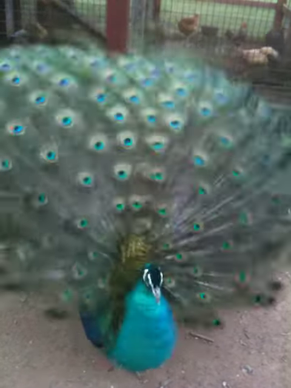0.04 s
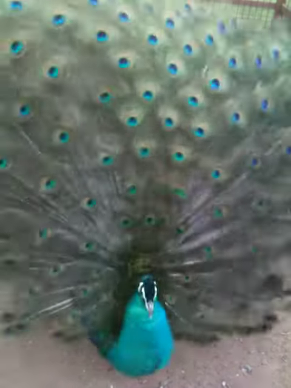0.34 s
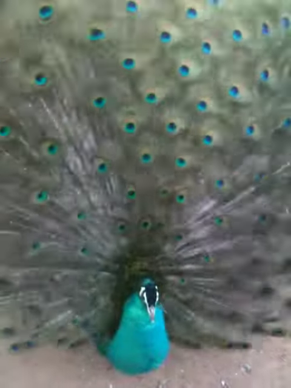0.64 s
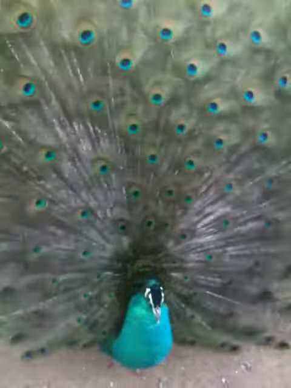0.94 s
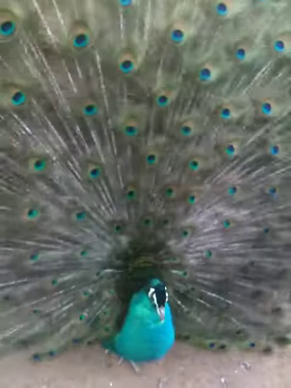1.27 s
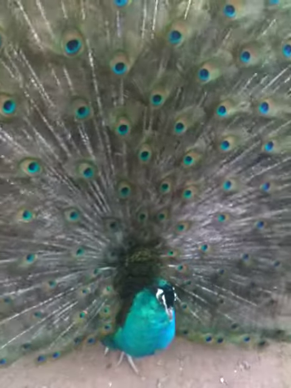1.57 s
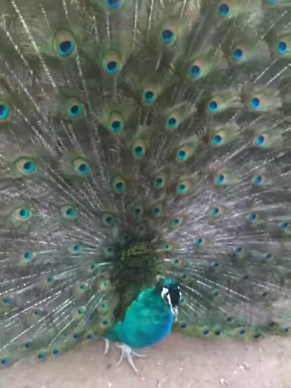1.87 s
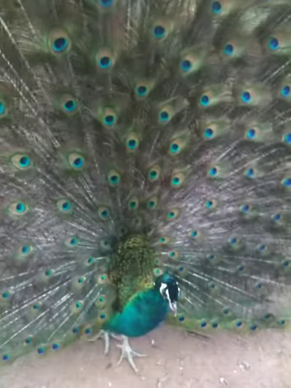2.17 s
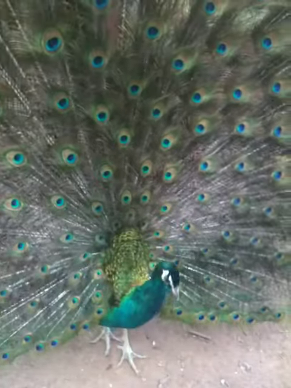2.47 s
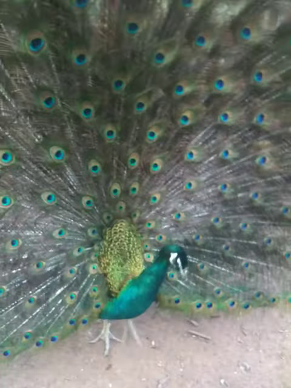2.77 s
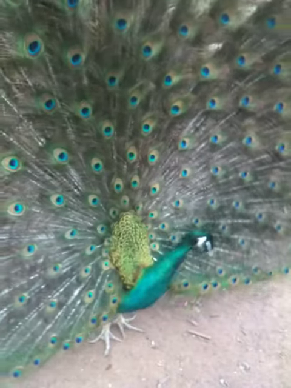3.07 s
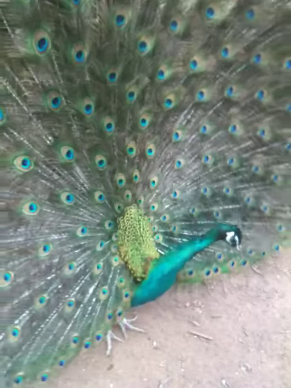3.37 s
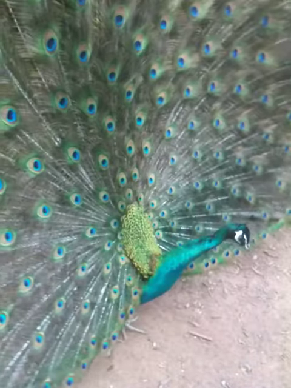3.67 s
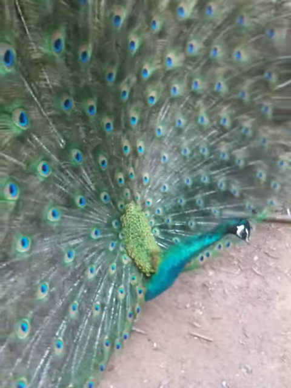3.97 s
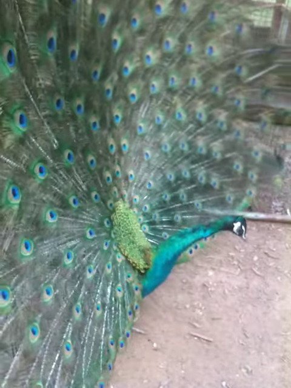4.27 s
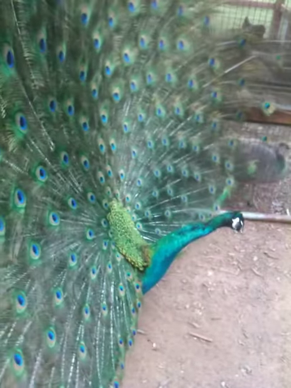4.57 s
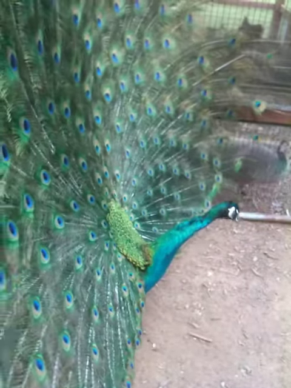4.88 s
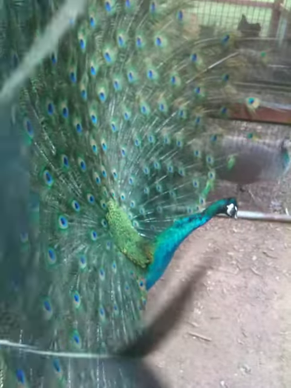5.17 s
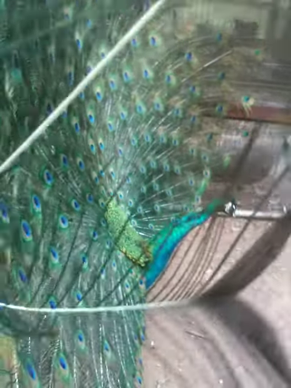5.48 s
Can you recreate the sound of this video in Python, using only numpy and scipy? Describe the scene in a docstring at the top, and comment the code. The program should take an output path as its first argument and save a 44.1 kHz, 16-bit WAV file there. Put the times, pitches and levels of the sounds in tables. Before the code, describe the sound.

Close by in an outdoor pen, a peacock shakes its raised tail, the quills clattering about ten times a second with small puffs of air. The rattle dies away into a soft rustle. As the bird steps round, something snaps underfoot, grit crunches and the feathers swish gently. Far off, birds faintly coo, chirp and whistle over a low rumble, a machine's hum and light hiss.

```python
"""An outdoor pen, one microphone close to a peacock shaking its raised train. About ten times a second
the quills clatter together and the fan puffs air; then the shaking dies away into a soft rustle of vanes.
The bird steps round: something snaps underfoot, grit crunches and the train swishes. Far off, birds coo,
chirp and whistle over a low rumble, a machine's hum and a faint hiss."""
import sys
import numpy as np
from scipy import signal
from scipy.fft import rfft, irfft, next_fast_len
from scipy.io import wavfile

SR = 44100
rng = np.random.default_rng(int(sys.argv[2]) if len(sys.argv) > 2 else 0)


def store_wav(level_fs):
    """Save 16-bit WAV to argv[1]."""
    pcm = np.round(np.clip(np.atleast_2d(level_fs), -1, 1) * 32767)
    wavfile.write(sys.argv[1], SR, pcm.T.astype(np.int16))


N = 243431
T = np.arange(N) / SR

# spectrum of the open-air hiss: f/Hz, level/dB
HISS_COLOUR = [(290, -40.5), (500, -9.5), (592, -1), (1300, -7), (3260, -11), (4020, -9.5), (4380, -11.5),
               (11400, -11.5), (14500, -10.5)]
# faint high whine: f/Hz, level/dB
WHINE_TONES = [(14971, -95), (15030, -85)]
# spectrum of the distant rumble: f/Hz, level/dB
RUMBLE_COLOUR = [(25, -33), (50, -28), (72, -18.5), (95, -3), (128, 2), (200, 1.5), (260, 4), (320, -1.5),
                 (385, -0.5), (450, -8), (600, -17.5), (1000, -33.5)]
# slow rise and fall of the rumble: t/s, relative level/dB
RUMBLE_LEVELS = [(1.5, -69.5), (2.07, -67.5), (2.64, -71), (3.08, -67), (3.85, -67.5), (4.62, -69),
                 (4.98, -66.5), (5.52, -67.5)]
# hum of a far machine before it fades: f/Hz, level/dB
HUM_TONES = [(91, -81), (259, -79)]
# swells of a vague, distant midrange stir: peak t/s, level/dB, rise/s, fall/s
STIR_SWELLS = [(1.6, -79.5, .8, 0.89), (2.9, -78, 0.19, 0.2), (5.05, -80, 0.35, .3)]
# spectrum of that stir: f/Hz, level/dB
STIR_COLOUR = [(300, -23.5), (600, -3.5), (1100, -1.5), (1800, -6), (2700, -10.5), (3600, -20), (6000, -25)]

# a small bird's raspy falling chirps: t/s, starting f/Hz, fall/share of f, rasp/share of f, level/dB
FAR_CHIRPS = [(2.508, 3950, .135, .033, -63), (3.192, 3690, .075, 0.042, -66),
              (4.219, 4270, .22, .085, -64.5)]
# thin calls that slide up and level off: t/s, length/s, starting f/Hz, rise/share of f, level/dB
FAR_PEEPS = [(2.573, .055, 7050, .015, -71.5), (4.817, .11, 7950, .14, -70.5)]
# level whistles and cries: t/s, length/s, f/Hz, level/dB
FAR_WHISTLES = [(2.845, .17, 1057, -75), (3.32, .22, 4130, -80.5), (3.51, 0.24, 4620, -81),
                (3.653, 0.43, 3510, -83), (4.645, 0.071, 1215, -79.5), (4.924, 0.31, 1434, -80.5)]
# low gliding coos: t/s, length/s, starting f/Hz, glide/share of f, level/dB
FAR_COOS = [(0, 0.086, 225, -0.042, -59.5), (1.801, 0.22, 387, -0.084, -62.5),
            (1.952, 0.144, 335, -.13, -62.5), (2.301, 0.171, 365, .2, -69), (2.846, .26, 262, -.26, -63.5),
            (3.188, 0.19, 223.4, 0.35, -67.5), (3.585, .14, 255, -0.13, -70),
            (3.673, .21, 128, -.13, -72.5), (4.183, 0.11, 268, -0.14, -66),
            (5.017, 0.34, 240, -0.21, -65.5)]

# spectrum of the train sweeping round: f/Hz, level/dB
SWISH_COLOUR = [(400, -11.5), (1500, -6), (2800, -2), (4300, -7), (5100, 1), (5800, 2.5), (6500, -5),
                (7500, 2), (8800, -5), (12000, -8), (15500, -24)]
# feet scuffing the grit: peak t/s, level/dB, length/s
FOOT_SCUFFS = [(1.896, -50.5, .021), (1.925, -60, 0.03), (2.433, -72, .012), (3.004, -68, 0.025),
               (3.045, -70, 0.039), (4.144, -72, 0.042), (4.73, -73.5, .11)]
# spectrum of the grit: f/Hz, level/dB
GRIT_COLOUR = [(180, -20), (300, -3.5), (812, -14.5), (896, -14.5), (1400, -7), (1740, -20), (1920, -11),
               (7370, -12), (15800, -17.5)]
# breaks underfoot: t/s, peak level/dB
SNAP_BREAKS = [(1.8698, -39), (1.8726, -39), (1.8766, -51)]
# modes ringing after each break: f/Hz, relative level/dB, t60/s
SNAP_RING = [(1370, -10.5, 0.0079), (2530, -15, 0.014), (5190, -4, 0.017), (5600, -6, 0.009),
             (7050, -7, 0.01), (8700, -7, 0.0093), (10000, -2, 0.0099), (10840, -5, .007)]

# swings of the train: t/s at full level, stroke level/dB, attack/s, hold/s, rebound level/dB
TRAIN_SWINGS = [(0.045, -38.5, 0.015, 0.016, -54), (0.16, -39.5, 0.02, 0.024, -38.5),
                (0.25, -36, 0.0024, 0.033, -45.5), (0.369, -34, 0.0034, 0.015, -45),
                (.476, -36, 0.0085, 0.014, -47), (.575, -34.5, .0015, 0.015, -40.5),
                (.687, -38, 0.004, 0.0043, -44), (0.778, -39.5, 0.0091, 0.012, -46),
                (0.878, -40, 0.0056, 0.013, -46.5), (.973, -37, 0.0031, 0.01, -46.5),
                (1.063, -41, 0.0088, 0.01, -47), (1.16, -44, 0.0046, 0.015, -49),
                (1.253, -47.5, 0.0016, 0.011, -55.5), (1.369, -53.5, .002, 0.024, -54.5),
                (1.465, -51, .002, .003, -53.5)]
# the fan billows once as it comes upright: peak t/s, level/dB, rise/s, fall/s
FAN_BILLOW = [(.184, -55, 0.014, .038)]
# spectrum of the air pushed by the fan: f/Hz, level/dB
WAFT_COLOUR = [(20, -17), (60, -7), (110, -12), (190, 1), (270, 3), (340, -9), (700, -55)]
# spectrum of vanes rubbing: f/Hz, level/dB
VANE_COLOUR = [(88, -36), (150, -3.5), (320, -9), (600, -2.5), (1100, -6), (1800, -5.5), (2800, -0.5),
               (4000, -3.5), (7250, -0.5), (13000, -8.5), (15800, -27)]
# resonances of the fan of shafts: f/Hz, width/Hz, lift/dB
SHAFT_RESONANCES = [(500, 53, 3), (670, 110, 1.5), (1001, 47, 4.5), (1412, 230, 4), (3390, 130, -0.5),
                    (7300, 1100, 2)]
# the heaviest stroke jolts the thick ends of the shafts: peak t/s, level/dB, rise/s, fall/s
SHAFT_JOLT = [(.377, -44.5, 0.0098, 0.0063)]
# spectrum of those thick ends: f/Hz, level/dB
JOLT_COLOUR = [(200, -31), (450, 7.5), (700, 13.5), (1050, 8), (1800, -22), (5000, -42)]
# hard knocks of quills meeting at the end of a swing: t/s, impulse level/dB
QUILL_KNOCKS = [(0.1413, -22.5), (0.256, -19.5), (0.2982, -20.5), (0.332, -22), (0.3653, -24), (.4143, -24),
                (0.5735, -23), (0.6228, -17.5), (.6865, -26), (0.7368, -31), (0.779, -22.5), (0.8155, -30),
                (0.8678, -32), (1.12, -24.5), (1.21, -25.5), (1.2483, -27), (1.2692, -32), (1.299, -28.5),
                (1.366, -35)]
# spectrum of quills striking: f/Hz, level/dB
QUILL_COLOUR = [(180, -25), (300, -10.5), (676, -6.5), (1230, -7), (1450, -6.5), (1860, -6.5), (3610, -2),
                (3990, -3.5), (7250, 1.5), (8840, -1.5), (14500, -8.5), (15800, -9)]


def undb(db):
    """Decibels to gain."""
    return 10 ** (np.asarray(db) / 20)


def unit(x):
    """Scale to an rms of one."""
    return x / np.sqrt(np.mean(x ** 2))


def colour(x, points, peaks=()):
    """Causal filter from (f/Hz, level/dB) points plus resonances; keeps the power of white noise."""
    size = 2 * next_fast_len(len(x))
    hz = np.maximum(np.fft.rfftfreq(size, 1 / SR), 1)
    point_hz, point_db = np.transpose(points)
    db = np.interp(np.log(hz), np.log(point_hz), point_db)
    for centre, width, lift in peaks:
        db = db + lift / (1 + (2 * (hz - centre) / width) ** 2)
    cepstrum = irfft(np.log(unit(undb(db))))
    cepstrum[1:size // 2] *= 2  # folding the cepstrum gives minimum phase
    cepstrum[size // 2 + 1:] = 0
    return irfft(rfft(x, size) * np.exp(rfft(cepstrum)))[:len(x)]


def drift(rate):
    """Smooth random wander that changes about rate times a second, rms one."""
    hz = np.fft.rfftfreq(N, 1 / SR)
    return unit(irfft(rfft(rng.standard_normal(N)) * np.exp(-(hz / rate) ** 2), N))


def ticks(rate, spread_db):
    """Random contacts of uneven strength, rate a second, rms one."""
    struck = rng.random(N) < rate / SR
    size = undb(spread_db * np.clip(rng.standard_normal(N), -2, 2)) * rng.choice([-1, 1], N)
    return unit(struck * size / np.sqrt(rate))


def swell(s, db, rise, fall, hold=0):
    """Amplitude of a rounded burst that reaches its level at s, holds and dies away."""
    outside = T - np.clip(T, s, s + hold)
    return undb(db) * np.exp(-.5 * (outside / np.where(T < s, rise, fall)) ** 2)


def swells(rows):
    """Amplitude of overlapping bursts, whose powers add."""
    return np.sqrt(sum(swell(*row) ** 2 for row in rows))


def ridge(peak_s, fall_db_per_s, rise_db_per_s=0):
    """Level in dB that holds at zero, or climbs to it, until peak_s and then falls steadily."""
    return np.where(T < peak_s, rise_db_per_s, -fall_db_per_s) * (T - peak_s)


def strikes(rows):
    """One impulse at each (t/s, level/dB)."""
    hits = np.zeros(N)
    for s, db in rows:
        hits[int(s * SR)] += undb(db)
    return hits


def tones(rows):
    """Steady sines at (f/Hz, rms level/dB)."""
    return sum(np.sqrt(2) * undb(db) * np.sin(2 * np.pi * (hz * T + rng.random())) for hz, db in rows)


def note(s, length, hz, glide, db, waver_hz):
    """A rounded note whose pitch slides by a share of itself, quickly at first, then levelling off."""
    progress = np.clip((T - s) / length, 0, 1)
    pitch = hz * (1 + glide * progress * (2 - progress)) + waver_hz
    envelope = 2 * np.sqrt(progress * (1 - progress))
    return undb(db) * envelope * np.sin(2 * np.pi * np.cumsum(pitch) / SR)


def reflections(x, t60, wet_db):
    """Add the diffuse tail that the surroundings scatter back to the microphone."""
    t = T[:SR // 2]
    tail = rng.standard_normal(len(t)) * np.exp(-np.log(1000) * t / t60)
    return x + undb(wet_db) * signal.fftconvolve(x, tail / np.linalg.norm(tail))[:N]


def shaft_buzz(contacts, fade_s, share):
    """Each contact is followed by its own brief burst of shaft vibration."""
    decay = np.exp(-2 / (fade_s * SR))
    energy = signal.lfilter([1 - decay], [1, -decay], contacts ** 2 + 1e-24)
    return contacts + share * np.sqrt(energy) * rng.standard_normal(N)


def ambience():
    """Beyond the pen: a distant rumble, a vague midrange stir, smooth hiss and a faint high whine."""
    rumble_db = np.interp(T, *np.transpose(RUMBLE_LEVELS)) - 0.5
    rumble = colour(rng.standard_normal(N), RUMBLE_COLOUR) * undb(rumble_db + 0.47 * drift(5))
    stir = colour(rng.standard_normal(N), STIR_COLOUR) * np.hypot(undb(-83.5), swells(STIR_SWELLS))
    hiss = colour(rng.standard_normal(N), HISS_COLOUR) * undb(-73.5 + 0.17 * drift(1.5))
    return rumble + stir + hiss + tones(WHINE_TONES)


def far_machine():
    """A machine hums a long way off, then fades under the rumble."""
    return tones(HUM_TONES) * undb(ridge(peak_s=3.3, fall_db_per_s=18) + drift(3.7))


def far_birds(chirp_s=.068, peep_rasp=.022, whistle_waver_hz=50.3, coo_waver_hz=31, trim_db=-2):
    """Calls blurred by distance, trimmed together: the chirps raspy, the long whistles nearly pure."""
    waver = drift(450)
    chirps = sum(note(s, chirp_s, hz, -fall, db, rasp * hz * waver)
                 for s, hz, fall, rasp, db in FAR_CHIRPS)
    peeps = sum(note(s, length, hz, rise, db, peep_rasp * hz * waver)
                for s, length, hz, rise, db in FAR_PEEPS)
    whistles = sum(note(s, length, hz, 0, db, whistle_waver_hz * waver)
                   for s, length, hz, db in FAR_WHISTLES)
    coos = sum(note(*coo, coo_waver_hz * waver) for coo in FAR_COOS)
    calls = (chirps + peeps + whistles + coos) * undb(trim_db)
    return reflections(calls, t60=0.4, wet_db=-1.5)


def train_swish():
    """The bird swings its fan round: a soft swish that swells quickly and fades slowly."""
    level_db = -63.5 + ridge(peak_s=2.1, rise_db_per_s=38, fall_db_per_s=19)
    brush = unit(ticks(2000, spread_db=7) + 2 * rng.standard_normal(N))
    return colour(brush * undb(level_db + 1.6 * drift(25)), SWISH_COLOUR)


def snap_underfoot(opening_s=0.00029):
    """Something brittle gives way in quick breaks; each takes a moment to open and rings briefly."""
    t = T[:SR // 20]
    ring = sum(undb(db) * np.sin(2 * np.pi * hz * t) * np.exp(-np.log(1000) * t / t60)
               for hz, db, t60 in SNAP_RING)
    ring *= 1 - np.exp(-t / opening_s)
    return signal.fftconvolve(strikes(SNAP_BREAKS), ring / np.abs(ring).max())[:N]


def grit_crunch(rise_share=0.35):
    """Grit crunches under the toes at each scuff."""
    grains = unit(ticks(2000, spread_db=3) + rng.standard_normal(N))
    scuffs = [(s, db, rise_share * length, (1 - rise_share) * length) for s, db, length in FOOT_SCUFFS]
    return colour(grains * swells(scuffs), GRIT_COLOUR)


def fan_waft(lag_s=.007, rise_s=.016, fall_s=.021):
    """The fan billows as it rises, and every stroke pushes a puff of air that grows with its force."""
    full_stroke_db, full_puff_db, puff_db_per_db = -34.5, -60.5, 1.04
    puffs = [(s + lag_s, full_puff_db + puff_db_per_db * (db - full_stroke_db), rise_s, fall_s)
             for s, db, *_ in TRAIN_SWINGS]
    return colour(rng.standard_normal(N) * swells(puffs + FAN_BILLOW), WAFT_COLOUR)


def vane_rustle(shaking_db=-48.5, resting_db=-78.5):
    """Barbs brush past each other in a fine, fluttering crackle that settles as the shaking ends."""
    level_db = np.maximum(shaking_db + ridge(peak_s=1.268, fall_db_per_s=45.5), resting_db)
    # the fan stands almost still just before each stroke, so the rustle dips
    lead_s, width_s, dip_db = .011, .0041, -2
    lulls = swells([(s - 2 * attack - lead_s, 0, width_s, width_s) for s, _, attack, *_ in TRAIN_SWINGS])
    flutter_db = 1.3 * drift(90)
    brush = unit(shaft_buzz(ticks(3000, spread_db=2.5), fade_s=.0015, share=.73))
    return colour(brush * undb(level_db + dip_db * lulls + flutter_db), VANE_COLOUR, SHAFT_RESONANCES)


def train_swing(release_s=.0082, surge_db=1.5):
    """Strength of the shaking: each stroke is followed by a rebound, and shafts meet in uneven clumps."""
    strokes = [(s, db, attack, release_s, hold) for s, db, attack, hold, _ in TRAIN_SWINGS]
    lag_s, rise_s, fall_s = .039, .013, .0094
    rebounds = [(s + hold + lag_s, db, rise_s, fall_s) for s, _, _, hold, db in TRAIN_SWINGS]
    return swells(strokes + rebounds) * undb(surge_db * drift(90))


def quill_clatter(bounce_s=.0018, bounce_db=-9):
    """Swings throw the shafts together, more of them when harder; a few knock loudly and bounce once."""
    swing = train_swing()
    contacts = ticks(1300 + 3500 * swing / swing.max(), spread_db=2)
    clatter = shaft_buzz(contacts * swing, fade_s=.0016, share=.8) * undb(-2.66)
    bounces = [(s + bounce_s, db + bounce_db) for s, db in QUILL_KNOCKS]
    knocks = shaft_buzz(strikes(QUILL_KNOCKS + bounces), fade_s=.0014, share=1.8)
    jolt = colour(rng.standard_normal(N) * swells(SHAFT_JOLT), JOLT_COLOUR, SHAFT_RESONANCES)
    return colour(clatter + knocks, QUILL_COLOUR, SHAFT_RESONANCES) + jolt


def scene():
    """One microphone in the open pen: the peacock close and nearly dry, everything else far behind."""
    shaking = quill_clatter() + fan_waft() + vane_rustle()
    stepping_round = snap_underfoot() + grit_crunch() + train_swish()
    peacock = reflections(shaking + stepping_round, t60=.16, wet_db=-16)
    return (peacock + far_birds() + far_machine() + ambience())[None]


def record(dry):
    """The recorder cuts the top steeply above 15.8 kHz."""
    return signal.sosfilt(signal.ellip(10, .2, 70, 15800, fs=SR, output="sos"), dry)


dry = scene()
out = record(dry)
store_wav(out)
```